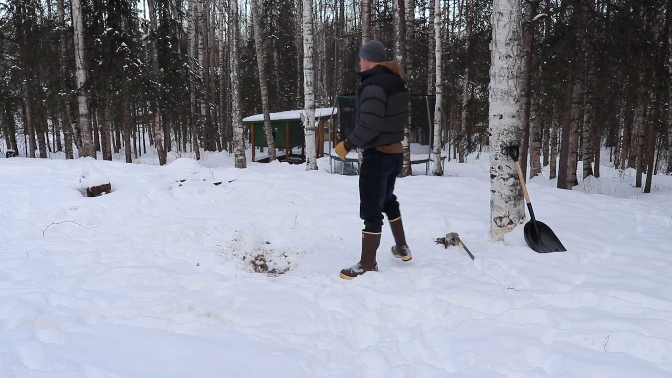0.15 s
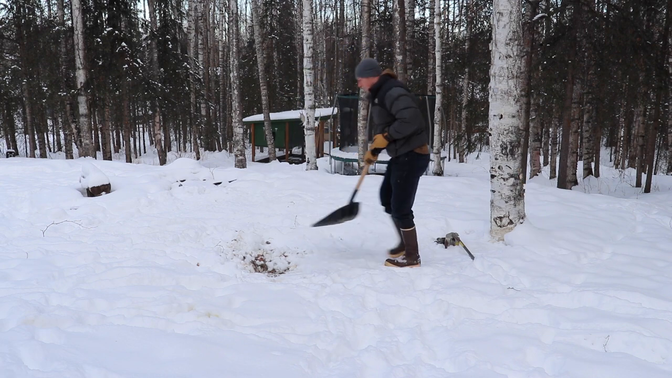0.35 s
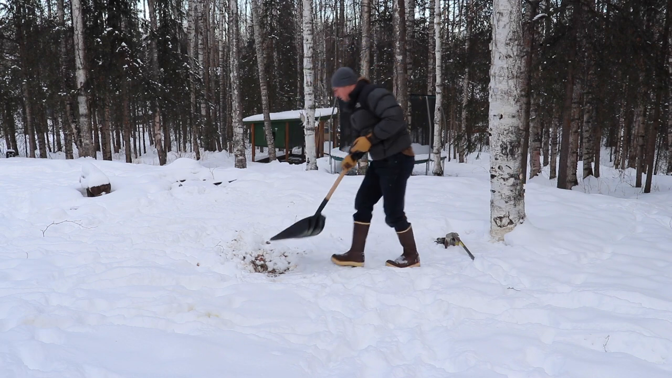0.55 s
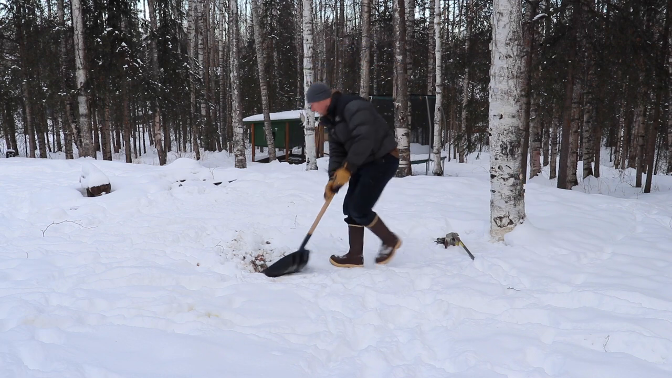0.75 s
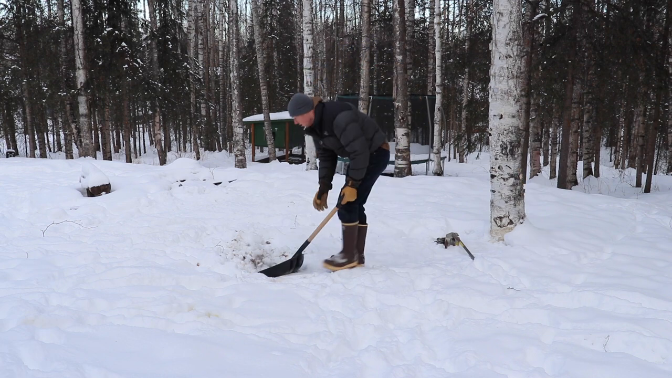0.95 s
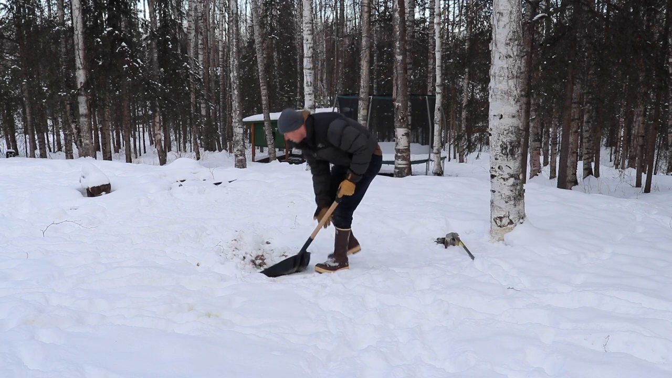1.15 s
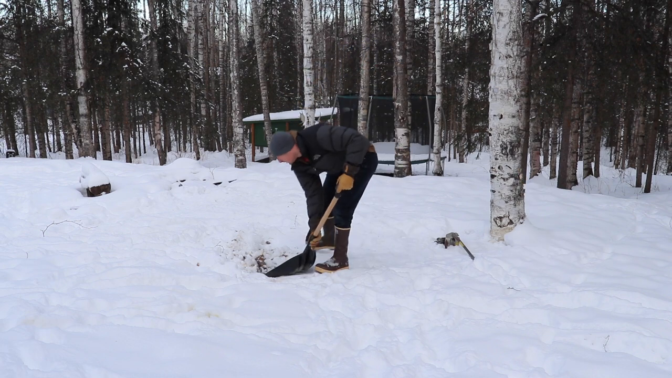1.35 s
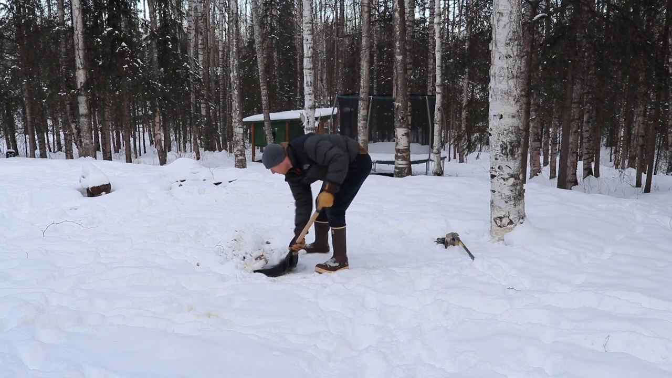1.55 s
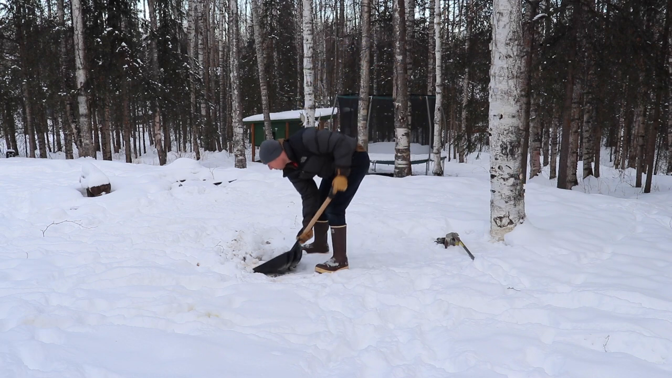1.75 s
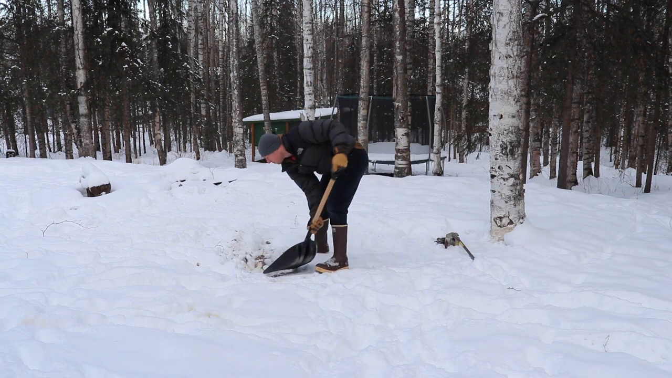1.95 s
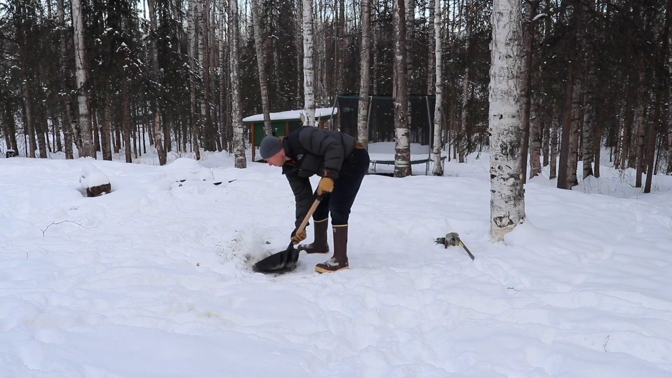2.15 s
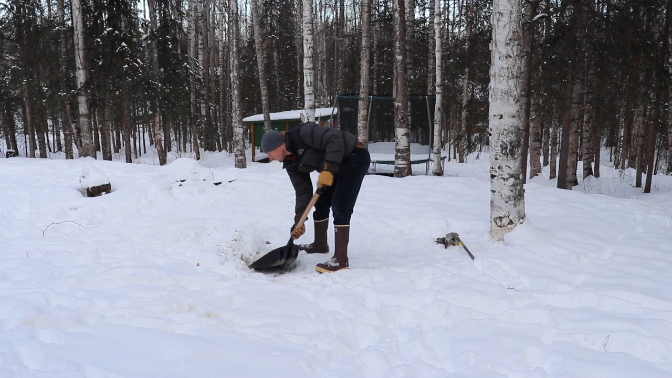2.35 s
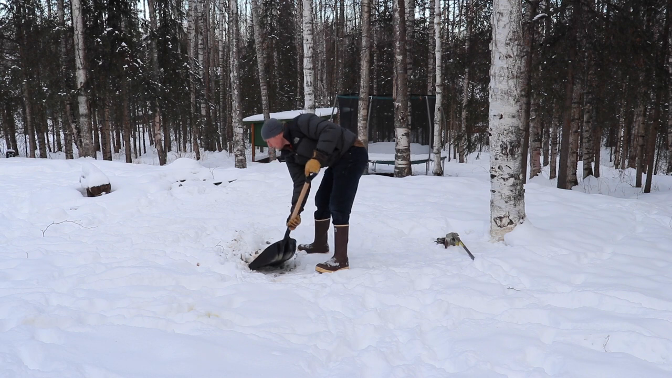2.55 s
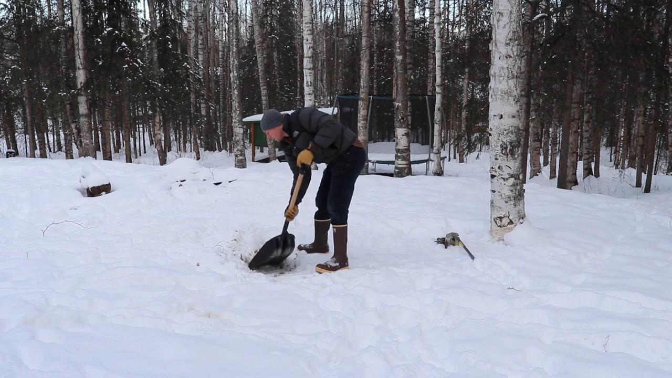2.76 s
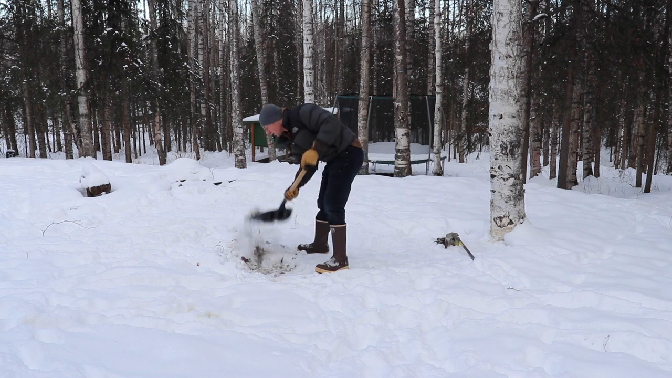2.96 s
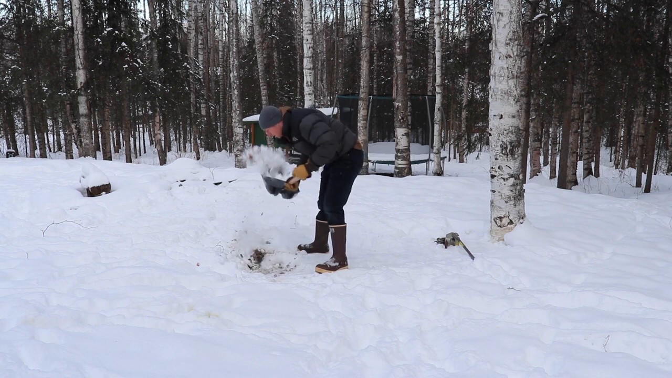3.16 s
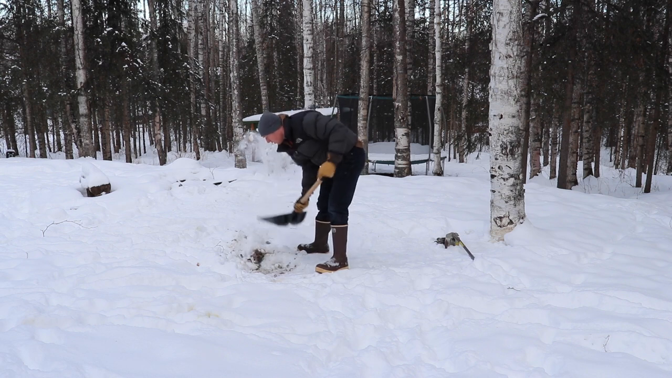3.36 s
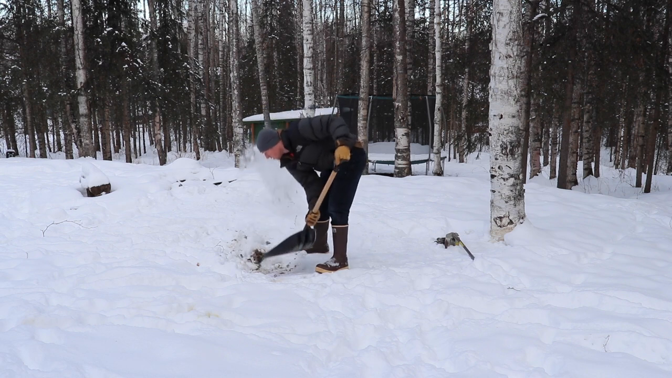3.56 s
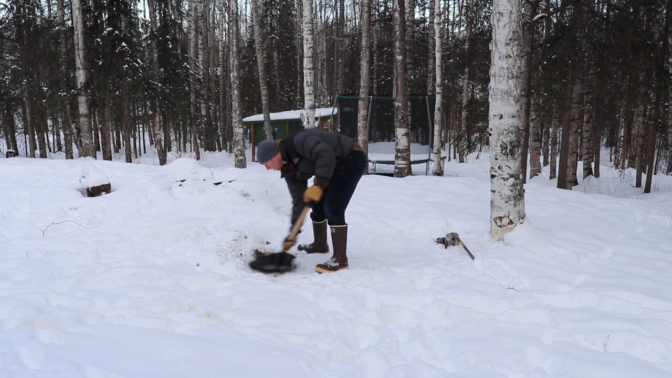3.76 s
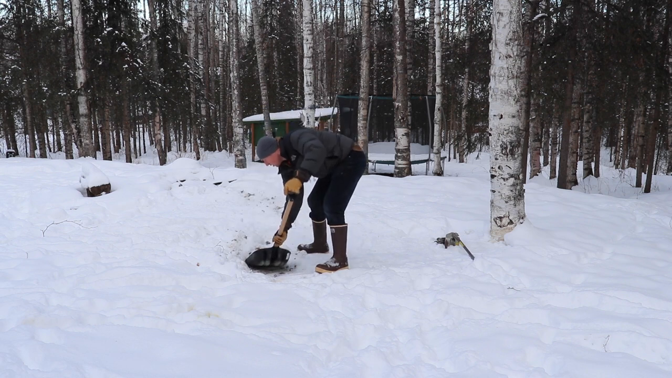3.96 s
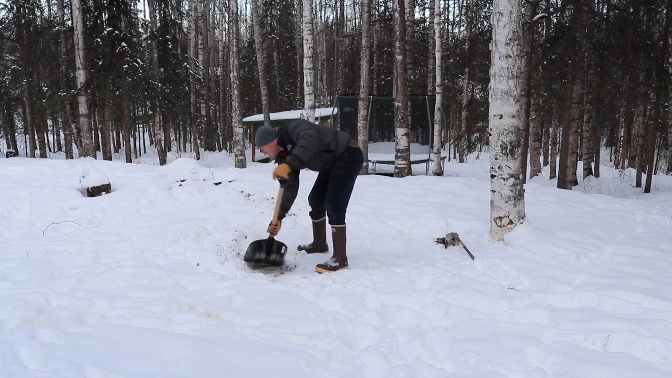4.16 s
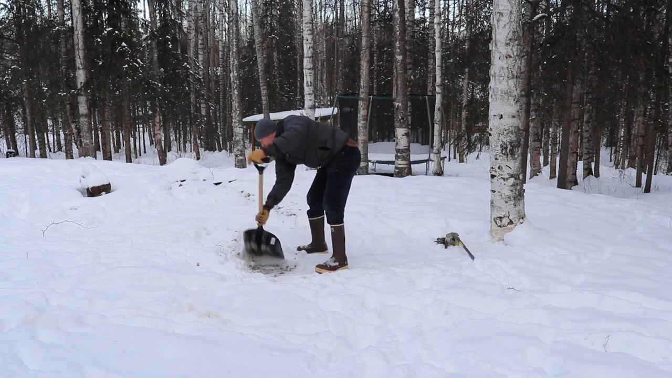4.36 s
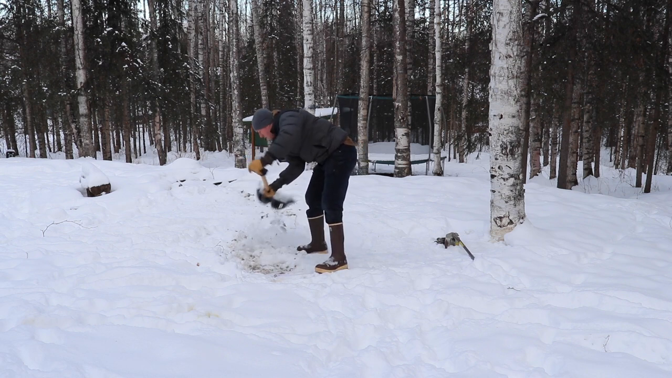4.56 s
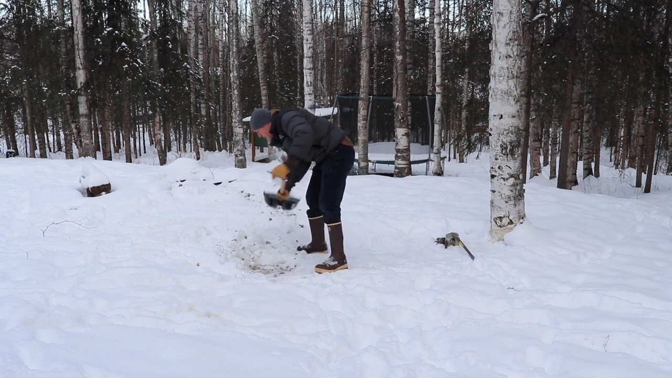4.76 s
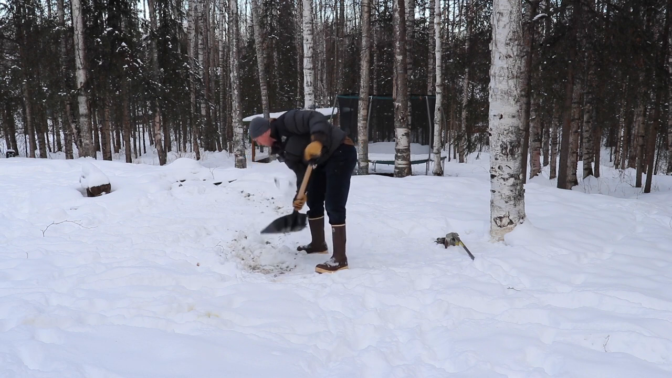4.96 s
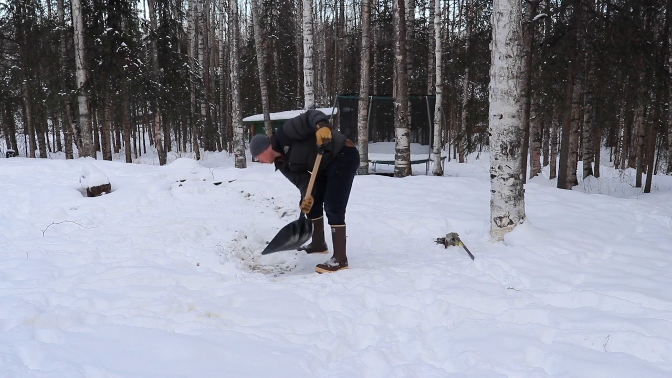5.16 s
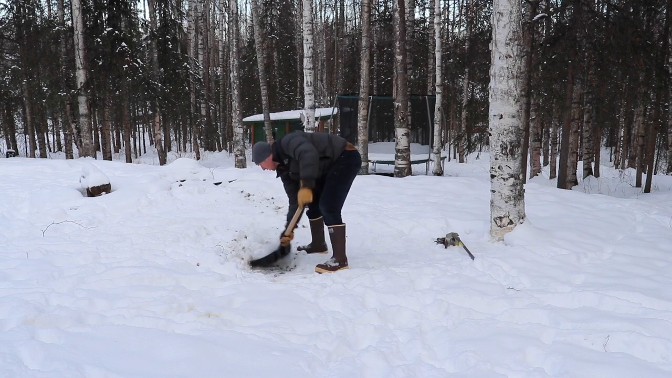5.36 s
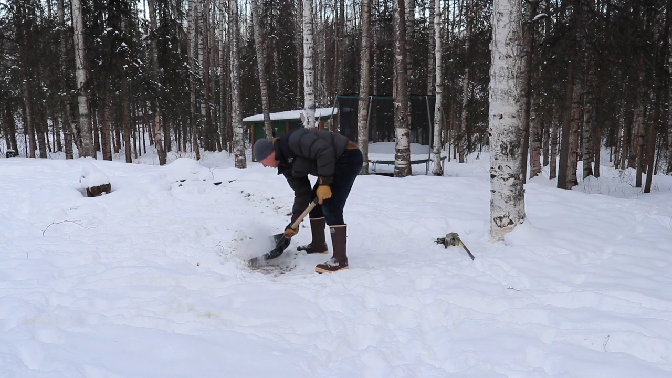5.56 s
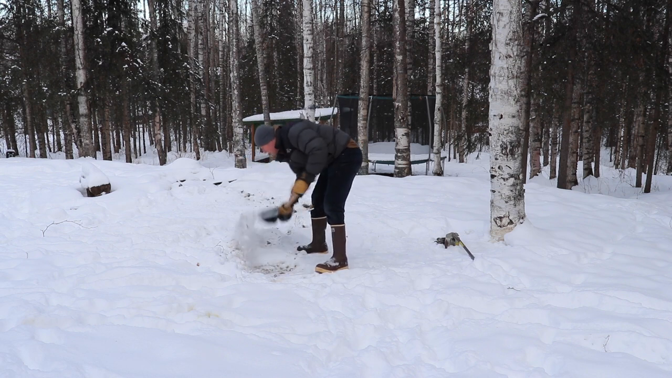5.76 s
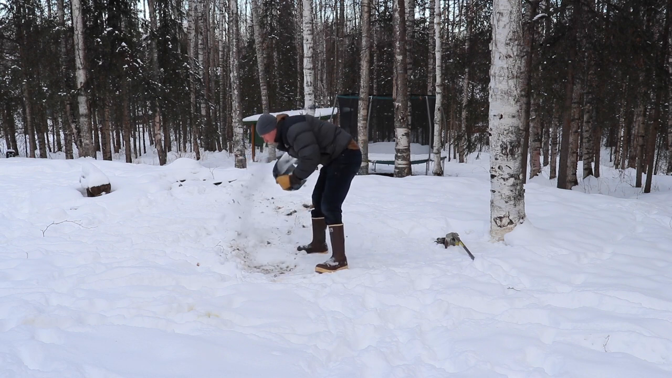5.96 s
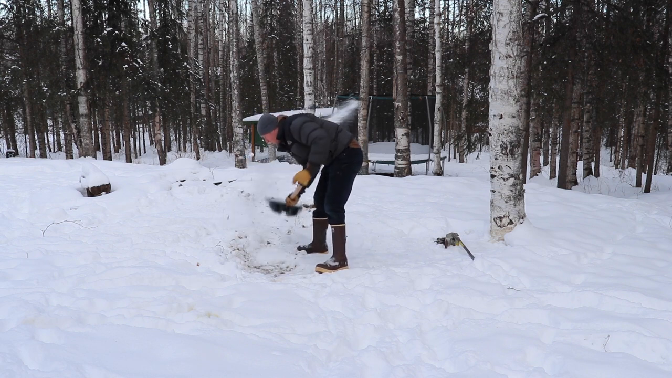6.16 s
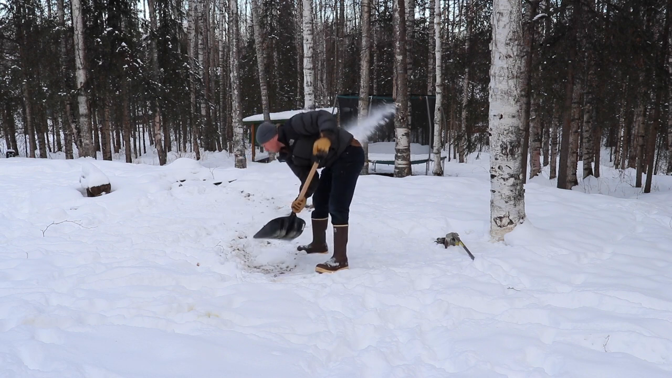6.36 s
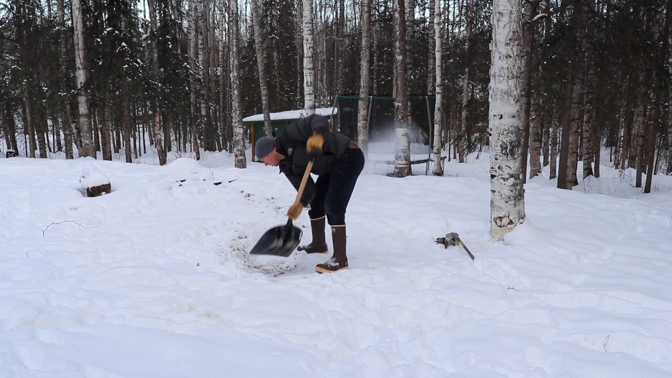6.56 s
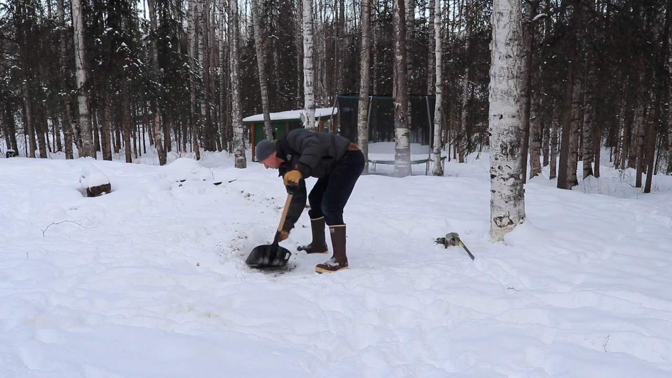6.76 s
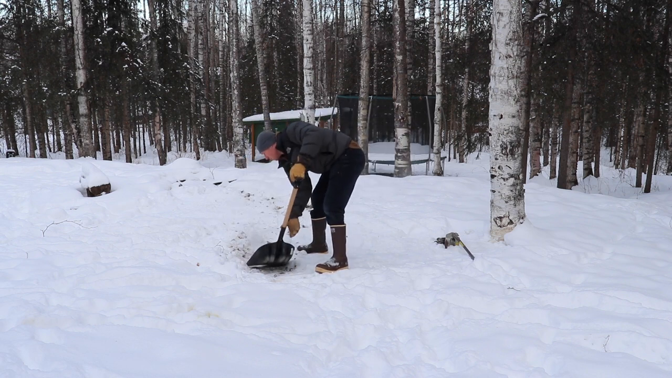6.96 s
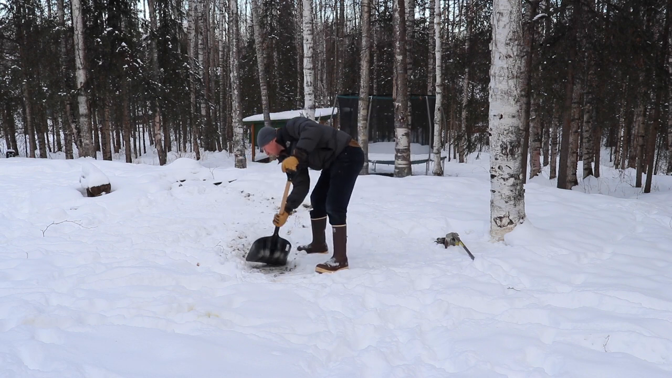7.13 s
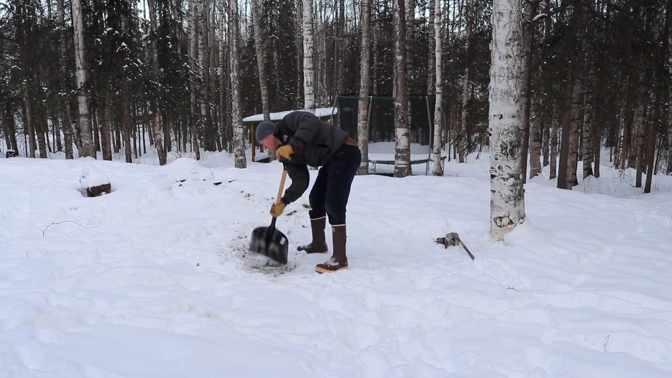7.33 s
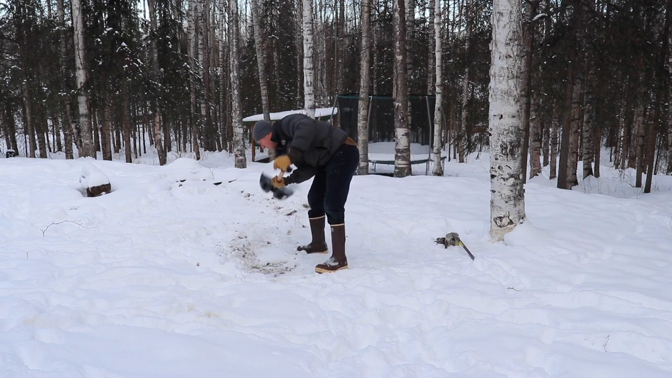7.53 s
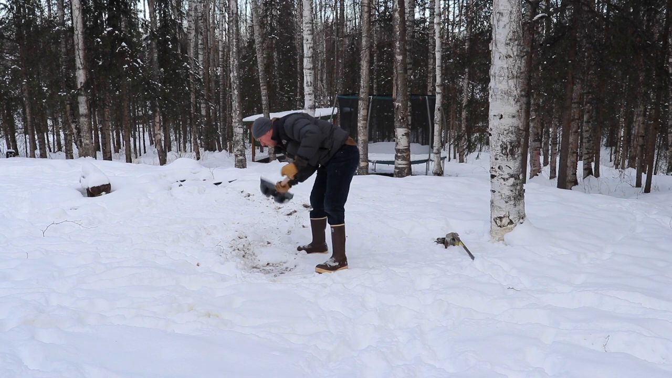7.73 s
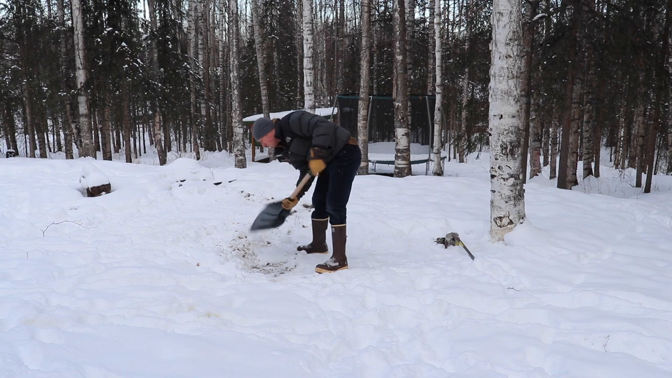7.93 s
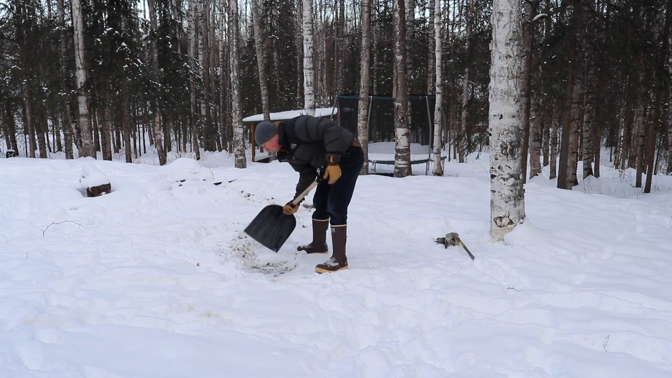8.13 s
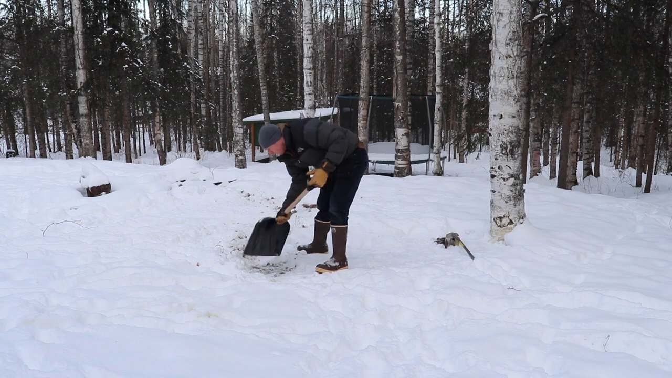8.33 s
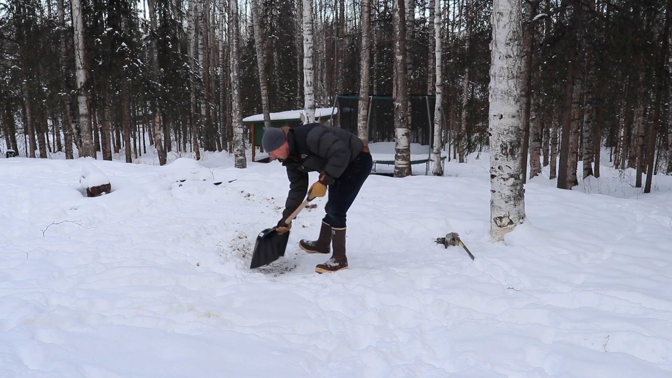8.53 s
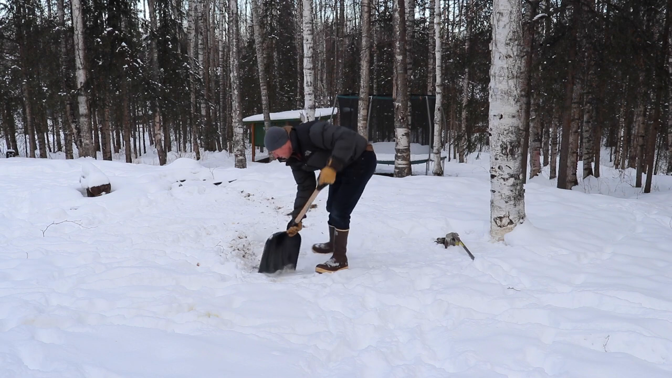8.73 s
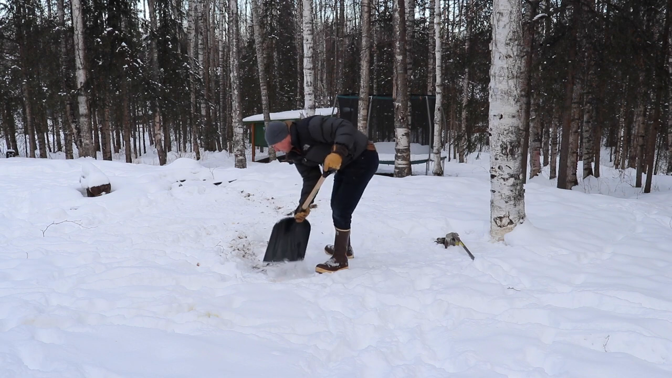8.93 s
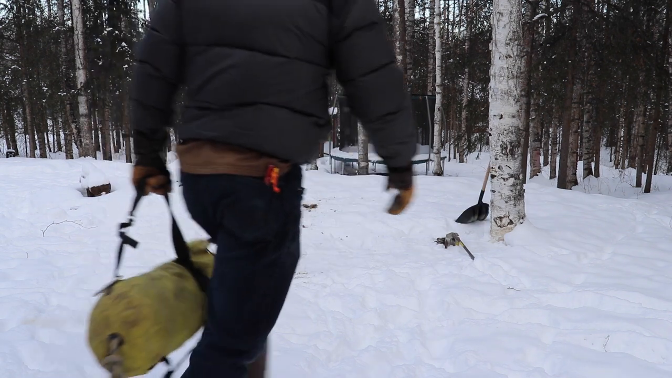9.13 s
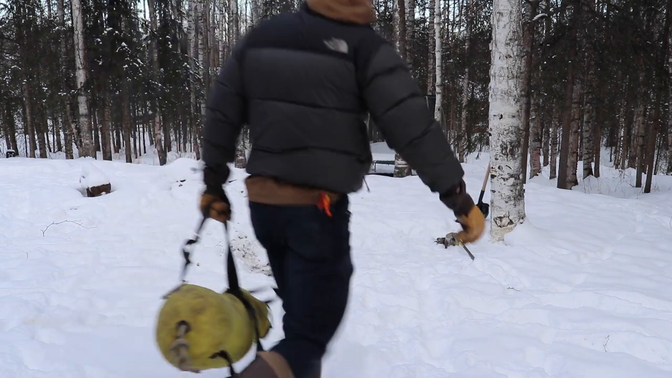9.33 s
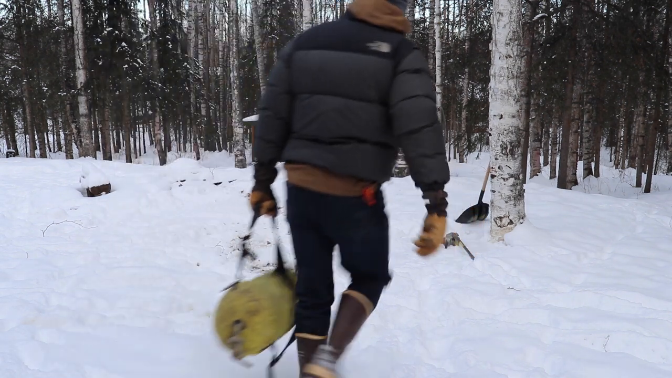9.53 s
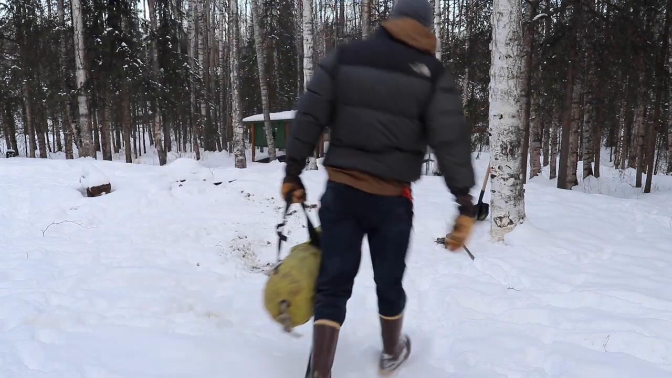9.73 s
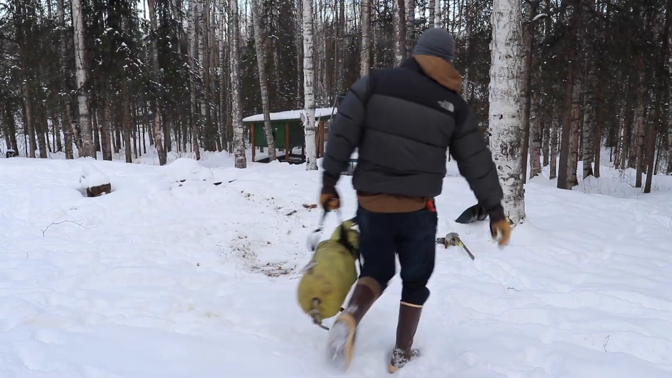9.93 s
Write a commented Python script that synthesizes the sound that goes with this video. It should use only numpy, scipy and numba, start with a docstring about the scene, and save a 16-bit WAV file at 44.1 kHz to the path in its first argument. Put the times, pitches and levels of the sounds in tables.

```python
"""In a still forest, a plastic shovel chops and scrapes packed snow some metres from a small microphone.
Snow crystals break in dense grains and shake the blade; loose snow pours off after each toss.
Boots crunch before the digging and close by afterwards. Tree trunks send back a short echo,
and a far-off hum and the microphone's hiss stay under it all."""
import sys
import numpy as np
from scipy import signal
from scipy.fft import rfft, irfft
from scipy.io import wavfile
from scipy.ndimage import uniform_filter1d
from numba import njit

SR = 44100
rng = np.random.default_rng(int(sys.argv[2]) if len(sys.argv) > 2 else 0)


def log_audio(samples):
    """Write samples as a 16-bit WAV file to the path given in sys.argv[1]."""
    # one column per channel
    frames = np.atleast_2d(samples).T
    # limit to full scale, then quantise
    limited = np.clip(frames, -1, 1)
    pcm = np.round(limited * 32767).astype(np.int16)
    wavfile.write(sys.argv[1], SR, pcm)


N = 440559
TIME = np.arange(N) / SR

# Shoves of the blade into the snow. Ring and ice are added to the level; a mode is a note of the blade.
# start_s, swell_s, hold_s, level_db, fade_db_per_s, ring_db, ice_db,
# lowest_mode_db, edge_modes_db, freest_edge_hz, ground_thump_db
SHOVES = [(0.854, 0.0017, 0.091, -19.5, 192, -8, -2.5, 0.5, -4, 1360, 0.5),
          (1.041, 0.004, 0.012, -22.5, 419, -9, 0, -8, -55, 1310, 2),
          (1.105, 0.19, .09, -27, 210, -7, -7, -17, 11, 1410, 2),
          (1.407, 0.025, 0.015, -22.5, 98, -7, -3.5, -27, 10, 1310, 0),
          (1.549, 0.067, 0.066, -15, 166, -7.5, -5, -3, 4.5, 1770, 4),
          (1.774, 0.0023, 0.03, -21, 348, -9, -9, -2, 0, 1930, -6),
          (1.824, 0.052, 0.045, -20, 150, -12, -6, -14, -5, 1880, -4),
          (2.047, 0.11, 0.065, -17.5, 307.5, -7.5, -5.5, 1.5, 9, 1300, 0.5),
          (2.262, 0.067, 0.2, -32, 67, -5.5, -2.5, -1, 3.5, 1423, -1),
          (2.66, 0.0024, 0.036, -34, 402, -5.5, -24, 4.5, 11, 1387, 6),
          (2.808, 0.1, 0.046, -20.5, 900, -9, -6, 7.5, 13.5, 1210, 4),
          (3.845, 0.0029, 0.01, -13, 300, -7.5, -5, -6, 10.5, 1640, 3),
          (3.884, 0.024, 0.22, -30.5, 202, -10.5, -1.5, 7, -12, 1680, 6.5),
          (4.093, 0.088, 0.055, -22.5, 108, -15.5, -3, 8, 7, 1780, 5),
          (4.333, 0.062, 0.11, -19, 1000, -15, 1, 8, 13, 1760, 5.5),
          (5.434, 0.00068, 0.0048, -12.5, 174, -12, 0, -3, 8.5, 2120, 6),
          (5.58, .003, 0.026, -24.5, 166, -9.5, -6, 5, -1, 1500, -4),
          (5.627, .12, 0.1, -16, 602, -13, -5.5, -2, -1, 1520, -3),
          (6.76, .004, 0.014, -13.5, 701, -8.5, -4.5, 18, 11, 1890, 8),
          (6.804, 0.005, 0.014, -36, 450, 2.5, -8, 6, -10, 1900, -5),
          (6.909, 0.039, 0.0095, -22, 116, -3, 2, 5, 12.5, 2050, -5),
          (7.134, 0.0027, 0.014, -27.5, 300, 3, 0, 3, 18, 1790, -7),
          (7.186, 0.006, 0.09, -24, 294, -5.5, -0.5, 4, 9, 1740, 0),
          (7.326, 0.1, 0.058, -16, 593, -11.5, -4, 5, 5, 1620, -7),
          (8.311, 0.0031, 0.022, -20.5, 286, -2.5, -4.5, -9, 6, 1530, 3),
          (8.394, 0.08, 0.11, -27, 196, -6.5, -5.5, -15, 6, 1500, 5),
          (8.53, 0.0037, 0.16, -19.5, 600, -11, -0.5, -36, 6, 1450, 7),
          (8.703, 0.022, 0.24, -23, 500, -3, -1, -3, 17, 1410, 6),
          (8.978, 0.0094, 0.014, -29, 151, 2, -7.5, 8, 13.5, 1370, -14)]
# Powder sliding off after a toss: start_s, swell_s, hold_s, level_db, fade_db_per_s, ring_db, ice_db
POURS = [(3.001, 0.016, 0.062, -28, 101, -9, -5), (4.497, 0.016, .12, -31.5, 84, -10, -5.5),
         (5.827, 0.011, 0.0074, -27.5, 105, -13.5, 0.5), (7.528, 0.11, 0.06, -34.5, 63, -4.5, -11.5)]
# Faint brushing as the blade swings back: same columns as POURS
BRUSHES = [(3.3, 0.023, 0.099, -50.5, 120, -5, 2), (3.78, .005, 0.05, -51, 300, -17, 13),
           (5.12, 0.1, 0.038, -50.5, 200, -19, 5), (6.0, 0.0059, 0.012, -40.5, 150, -5.5, 4.5),
           (6.38, 0.13, 0.02, -61, 90, -6, 6), (7.9, .1, 0.21, -54, 151, 1.5, -4)]
# The blade held in the air: lowest_mode_db, edge_modes_db, freest_edge_hz, ground_thump_db
RAISED_BLADE = (-4, -4.5, 1510, -12)
# Crust breaking under the edge (ring and ice add to the level):
# time_s, level_db, ring_db, ice_db, clack_hz
CRUST_BREAKS = [(0.843, 5.5, -41, -19.5, 2660), (0.862, -1, -16, -11, 1260), (0.8972, 1, -32, -22, 2260),
                (1.0466, -1.5, -11.5, -17.5, 1500), (1.159, -12, -35, -14, 810),
                (1.26, -11, -17, -8.5, 1950), (1.3299, -13, -8, -15, 820), (1.6025, -1, -27, -23.5, 1520),
                (1.6288, -3, -30, -27, 1230), (1.6547, -3.5, -27, -21, 2770),
                (1.7853, -8, -3.5, -20.5, 1200), (1.9677, -6, -30, -21, 1480),
                (2.0512, -10.5, -16, -11, 1700), (2.5868, -14.5, -12, -9, 1750),
                (2.6718, -10.5, -11, -18, 815), (2.695, -7.5, -17, -20, 810),
                (2.727, -12, -12.5, -16.5, 1750), (2.792, -12, -15, -9.5, 2180),
                (2.8438, -6, -12.5, -21, 900), (2.9037, -9, -30, -6, 1270), (2.9166, -2, -39, -12.5, 1330),
                (3.8544, 2.5, -21, -17, 1180), (3.872, -5, -22, -8, 2800), (3.915, -10, -27, -14, 2300),
                (3.952, -10, -26, -9, 2920), (3.998, -0.5, -33.5, -11.5, 2020),
                (4.0387, -11.5, -12, -9, 2150), (4.1482, -4.5, -28, -17, 1680),
                (4.391, -13, -19, -10, 1870), (4.5304, -11, -21, -12, 1480), (5.435, 5.5, -16, 0.5, 1930),
                (5.591, -9, -18.5, -13.5, 1940), (5.687, -14, -7, -14, 1290), (5.7046, -10, -20, -14, 1530),
                (6.766, -1, -25, -3, 2530), (7.143, -12, 0, -18, 814), (7.3245, 3.5, -17, -24, 1290),
                (7.3565, -9, -5, -9, 3330), (7.432, -0.5, -31, -15, 2950), (7.4442, 1.5, -31, -13, 1430),
                (8.314, 0, -22, -11, 3180), (8.459, -10, -18, -8, 3440), (8.537, 2.5, -25, -22, 1030),
                (8.573, 3, -22, -20, 1600), (8.767, -7.5, -17, -2.5, 1450)]
# Crumbs ticking on the raised blade: same columns as CRUST_BREAKS
CRUMB_TICKS = [(4.6369, -10, -16, -15, 2740), (4.8517, -15, -22, -19, 2500), (6.4502, -36, -14, -4, 842),
               (6.4722, -36, -18, -1, 807)]
# Snow crumbling: breaks that build for a few milliseconds before they snap; same columns as CRUST_BREAKS
SOFT_BREAKS = [(1.085, -4.5, -24, -9, 3400), (1.4106, -13, -26, -19, 2610), (2.0757, 0, -20, -13.5, 1740),
               (2.143, 0, -26, -10, 1320), (2.469, -7, -16.5, -14, 1320), (2.8266, -3.5, -19.5, -23, 1710),
               (2.983, -1, -29, -20, 1420), (4.0808, -2.5, -12.5, -13, 2450),
               (4.1911, -4.5, -39, -13, 1740), (5.822, -6, -13, -16, 1460), (6.958, -5, -30, -9, 2470),
               (7.2008, -6, -9, -15, 616), (8.684, -6, -18, -8, 1490), (8.736, -4, -10, -8, 1290),
               (8.854, -8, -15, -5, 1500), (8.988, -8, -25, -19, 2930)]
# Single shards snapping off, short and dry: time_s, level_db
SHARD_SNAPS = [(1.037, -11), (2.092, -7), (2.8906, -11), (2.929, 2.5), (2.9671, 0), (3.8464, -3),
               (4.01, -14), (4.1325, -12), (4.1633, -10), (4.2316, -16), (4.2624, -18), (4.4117, -7),
               (6.9818, -5), (7.0393, -9), (7.0604, -15.5), (7.4798, -2), (8.341, -6), (8.607, -10),
               (8.6645, -8), (8.692, -4)]
# Low modes of the blade's bowl: pitch_hz, width_hz, level_db
BOWL_MODES = [(394.8, 37.6, -1), (641, 12, -13), (768, 37, 2.5)]
# Modes of the blade's edge: pitch_hz, width_hz
EDGE_MODES = [(1050, 30), (1275, 54), (1500, 64), (1720, 31), (1950, 59), (2350, 32), (2750, 94)]
# Strength of the top treble in each scoop: start_s, gain_db
SCOOP_TREBLE = [(0, 0.5), (1.4, 0.5), (3.0, 5), (3.95, -3), (5.5, 2), (6.7, -1), (8.3, 0.5)]
# Boots pressing on snow (crunch adds to the level):
# start_s, swell_s, hold_s, level_db, fade_db_per_s, crunch_db
STEPS = [(0.42, 0.21, 0.26, -51, 100, 7), (0.66, 0.065, 0.02, -38, 111, 2.5),
         (1.13, 0.0086, 0.063, -35, 200, -29), (9.07, 0.052, 0.15, -44, 200, 4),
         (9.34, 0.067, 0.074, -28.5, 341, -0.5), (9.56, 0.065, 0.16, -41.5, 300, 1),
         (9.8, 0.12, .1, -34.5, 50, -0.5)]
# Snow giving way under a sole: time_s, level_db, crunch_db, pop_hz
SOLE_GIVES = [(0.455, -25, 4, 283), (0.525, -28.5, 8.5, 692), (0.588, -25.5, 6, 676),
              (9.115, -12.5, -4, 714), (9.269, -12, -22, 604), (9.306, -14, -4, 141),
              (9.344, -12.5, -1.5, 231), (9.408, -7, -17, 573), (9.427, -3, -8, 373), (9.47, -13, -22, 517),
              (9.565, -18, -1, 111), (9.63, -12, -10, 627), (9.676, -11, -15, 633), (9.856, -12.5, 5, 416),
              (9.874, -15.5, 9.5, 420), (9.916, -6.5, -6, 511)]
# Tone curves of crushed snow, fine ice, boot thud, boot crunch and the background: pitch_hz, level_db
CRUSH_TONE = [(300, -23), (700, -8.5), (1400, 2), (2800, 1.5), (4300, -4), (6500, -5), (12000, -18)]
ICE_TONE = [(2500, -27.5), (4500, 2), (6500, 1.5), (9000, 2), (13000, -1), (16000, -15)]
THUD_TONE = [(30, -31), (60, -8), (120, 10), (250, 7), (550, 11), (1000, -4), (2500, -35)]
CRUNCH_TONE = [(400, 4.5), (900, 8.5), (2000, 1.5), (5000, -6.5), (10000, -8.5), (16000, -11)]
FOREST_TONE = [(15, -35), (25, -15), (160, -8.5), (282, -1.5), (305, -5.5), (469, -4.5), (1530, -17),
               (3930, -26.5), (6740, -26.5), (8350, -26.5), (10600, -28.5), (15500, -28)]
# Resonances of the microphone's housing: pitch_hz, width_hz, gain_db
MIC_HOUSING = [(6710, 770, -4), (8200, 1230, 7), (10560, 4370, -10.5), (11870, 15200, -2)]

SHOVEL_SOUND_ENDS_S = 9.068
BREAK_T60_S, GIVE_T60_S, SNAP_T60_S = 0.072, 0.051, 0.015  # T60: the time to fade by 60 dB
SOFT_RISE_S, CLACK_FADE_S = 0.0051, 0.0035
SETTLE_DB, SETTLE_DB_PER_S = -17.5, 56  # crumbs settle after each move, quieter than the move itself


def shovel():
    """One jerky force crushes snow, grinds fine ice, rings the blade and thumps the ground."""
    raised, *seating = blade_seating()
    moves, cracks = SHOVES + POURS + BRUSHES, CRUST_BREAKS + CRUMB_TICKS + SOFT_BREAKS
    crack_s, crack_db, ring_db, ice_db, clack_hz = np.transpose(cracks)
    lead_s = SOFT_RISE_S * np.isin(crack_s, np.transpose(SOFT_BREAKS)[0])
    snap_s, snap_db = np.transpose(SHARD_SNAPS)
    snaps = loudness([], 1, SHARD_SNAPS, snap_db, SNAP_T60_S)

    force = np.minimum(stick_slip(100, sag_s=0.0084, steady=1), 1.7)
    force = force ** (1 - 1.4 * raised)  # loose powder hardly sticks
    force = force * edge_stalls(depth=0.27, lead_s=0.032) * (TIME < SHOVEL_SOUND_ENDS_S)
    # Coarse lumps and fine ice also give way in their own time.
    brisk = stick_slip(70, sag_s=0.0013, steady=0.3)
    lump_force = force * stick_slip(66, sag_s=0.041, steady=5.2) * brisk ** 0.37
    crush_gain = loudness(moves, lump_force, cracks, crack_db - 16, BREAK_T60_S, lead_s)
    ice_gain = loudness(moves, force * brisk, cracks, crack_db + ice_db - 5, BREAK_T60_S, lead_s,
                        extra_db_column=6)
    shake_gain = loudness(moves, force, cracks, crack_db + ring_db - 8, BREAK_T60_S, lead_s,
                          extra_db_column=5)

    clumps = undb(-7) * grains(150, 1000, 4500, cycles=14, spread_db=3, smooth=0)
    crush = grains(4000, 482, 7030, cycles=7.7, spread_db=2.7, smooth=0.81) + clumps
    crush *= np.hypot(undb(-12.5) * snaps, crush_gain)
    shards = undb(-11) * grains(160, 3500, 14300, cycles=10, spread_db=4.2, smooth=0)
    ice = grains(1600, 2920, 18500, cycles=3.6, spread_db=4.7, smooth=0.87) + shards
    ice *= np.hypot(undb(-15.5) * snaps, ice_gain)
    shake = grains(900, 89, 2310, cycles=1.5, spread_db=1.7, smooth=0.91) * shake_gain

    # Each crack and snap also gives one sharp knock.
    crack_at = (crack_s * SR).astype(int)
    shake[crack_at] += undb(crack_db + ring_db + 15)
    crush[crack_at] += undb(crack_db - 3)
    crush[(snap_s * SR).astype(int)] += undb(snap_db + 2)
    snow = undb(-4.5) * colour(crush, CRUSH_TONE) + colour(ice, ICE_TONE)
    return snow + blade_and_ground(shake, crush, *seating) + clacks(crack_at, clack_hz, crack_db - 13.5)


def blade_and_ground(shake, crush, lowest_db, edge_db, freest_hz, ground_db):
    """Shaking rings the plastic bowl and thumps the ground; crushed snow rings the edge."""
    shares = (1, 0, -0.31)  # the top bowl mode weakens as the lowest grows
    bowl = sum(blade_mode(shake * undb(db + share * lowest_db), hz, width)
               for (hz, width, db), share in zip(BOWL_MODES, shares))
    # The snow muffles an edge mode more the further it lies from the freest one.
    edge = sum(blade_mode(crush * undb(edge_db - 33 * np.abs(np.log2(hz / freest_hz))), hz, width)
               for hz, width in EDGE_MODES)
    body = colour(shake, [(120, -40), (300, -4.5), (700, 6.5), (1200, -10.5), (3000, -34.5)])
    ground_tone = [(30, -35.5), (65, 3.5), (125, 7), (250, 16), (800, -32)]
    thump = colour(shake * undb(ground_db), ground_tone, size=8192)
    return undb(11.5) * bowl + undb(1.5) * edge + undb(-5.5) * body + undb(-19.5) * thump


def blade_mode(x, hz, width_hz):
    """One note of the blade, wandering in pitch as the plastic flexes."""
    bend = 0.027 * np.interp(TIME, np.arange(160) / 15, rng.standard_normal(160))
    turn = np.exp(2j * np.pi * hz * (1 + bend) / SR)
    return ring(x, turn, np.exp(-np.pi * width_hz / SR))


def blade_seating():
    """Whether the blade is raised at each moment, then the four values for how it sits in the snow."""
    in_snow = [(row[0], 0, *row[7:]) for row in SHOVES]
    in_air = [(row[0], 1, *RAISED_BLADE) for row in POURS]
    start_s, *columns = np.transpose(sorted(in_snow + in_air))
    current = np.maximum(np.searchsorted(start_s, TIME, side="right") - 1, 0)
    return [column[current] for column in columns]


def clacks(starts, hz, db):
    """Each crack makes one short, pitched clack."""
    poles = np.exp((2j * np.pi * hz - 1 / CLACK_FADE_S) / SR)
    return cut(pings(starts, poles, undb(db), np.full(len(starts), SR // 40)), "highpass", 350)


def edge_stalls(depth, lead_s):
    """The edge sticks and the grinding dips just before the crust breaks."""
    break_s = np.transpose(CRUST_BREAKS)[0]
    wait_s = np.append(break_s, np.inf)[np.searchsorted(break_s, TIME)] - TIME
    return 1 - depth * np.exp(-wait_s / lead_s)


def scoop_treble(x):
    """The top treble is stronger in some scoops than in others."""
    start_s, db = np.transpose(SCOOP_TREBLE)
    gain = undb(db)[np.searchsorted(start_s, TIME, side="right") - 1]
    top = signal.sosfiltfilt(signal.butter(2, 10500, "high", fs=SR, output="sos"), x)
    return x + (gain - 1) * top


def boots():
    """Snow packs down in lumps: pops, and dull thuds with a crunch on top from one creaking load."""
    give_s, db, crunch_db, pop_hz = np.transpose(SOLE_GIVES)
    load = stick_slip(75, sag_s=0.0037, steady=0.51)
    thud = grains(500, 51, 1140, cycles=3.6, spread_db=7.7, smooth=1)
    thud *= loudness(STEPS, load, SOLE_GIVES, db - 16.5, GIVE_T60_S)
    crunch = grains(1200, 440, 11000, cycles=1.4, spread_db=5.2, smooth=0.96)
    crunch *= loudness(STEPS, load, SOLE_GIVES, db + crunch_db - 20, GIVE_T60_S, extra_db_column=5)
    poles = np.exp((2j * np.pi - 1.6) * pop_hz / SR)
    pops = pings((give_s * SR).astype(int), poles, undb(db - 10.5), (6 * SR / pop_hz).astype(int))
    return colour(thud, THUD_TONE) + colour(crunch, CRUNCH_TONE) + cut(pops, "highpass", 90)


def grains(per_s, low_hz, high_hz, cycles, spread_db, smooth):
    """Crystals snap at random, some louder than most; smooth is the share of sliding-powder hiss."""
    when, pitch, chance = rng.random((N // 4, 3))[:int(per_s * N / SR)].T
    hz = low_hz * (high_hz / low_hz) ** pitch
    poles = np.exp((2j * np.pi - 2 / cycles) * hz / SR)
    sizes = hz * undb(-spread_db * np.log(np.maximum(chance, .02)))  # bigger when high, for an even tone
    snaps = pings((when * N).astype(int), poles, sizes, (3 * cycles * SR / hz).astype(int))
    return np.sqrt(1 - smooth) * unit(snaps) + np.sqrt(smooth) * rng.standard_normal(N)


def stick_slip(per_s, sag_s, steady):
    """Snow sticks and slips: the force jumps within 2 ms at random, then sags to a steady part."""
    catches = (rng.random(N) < per_s / SR) * rng.random(N)
    jumps = uniform_filter1d(catches, size=SR // 500)
    return unit(steady + signal.lfilter([1], [1, -np.exp(-1 / (sag_s * SR))], jumps))


def loudness(moves, force, cracks, crack_db, t60_s, lead_s=0., extra_db_column=None):
    """One layer's gain over time: jerky moves swell, hold and fade; cracks add dying bursts."""
    power = np.zeros(N)
    for move in moves:
        start_s, swell_s, hold_s, db, fade_db_per_s = move[:5]
        if extra_db_column:
            db += move[extra_db_column]
        start = int(start_s * SR)
        age = TIME[:min(int((swell_s + hold_s + .6) * SR), N - start)]
        fading_s = np.maximum(age - swell_s - hold_s, 0)
        fade_db = np.maximum(-fade_db_per_s * fading_s, SETTLE_DB - SETTLE_DB_PER_S * fading_s)
        swell = np.minimum(age / swell_s, 1) ** 1.19
        power[start:start + len(age)] += (undb(db + fade_db) * swell) ** 2
    power *= force ** 2
    age = TIME[:SR // 8]
    sharp = (undb(-60 * age / t60_s) + np.exp(-age / 0.0018)) * np.minimum(age / 0.00074, 1)
    soft = 1.2 * undb(-60 * np.maximum(age - SOFT_RISE_S, 0) / t60_s) * np.minimum(age / SOFT_RISE_S, 1)
    for crack, db, lead in zip(cracks, crack_db, np.broadcast_to(lead_s, len(cracks))):
        part = power[int((crack[0] - lead) * SR):][:len(age)]
        burst = soft if lead else sharp
        part += (undb(db) * burst[:len(part)]) ** 2
    return np.sqrt(power)


def trunk_echo(x, t60_s, db):
    """Tree trunks scatter a short, dull tail back."""
    age = TIME[:SR // 2]
    tail = rng.standard_normal(len(age)) * undb(-60 * age / t60_s) * (age > .008)
    echo = signal.oaconvolve(x, tail / np.linalg.norm(tail))[:N]
    return undb(db) * cut(echo, "lowpass", 4000, order=1)


def mic_housing(x):
    """The microphone's housing lifts one treble band and dulls others."""
    for hz, width_hz, db in MIC_HOUSING:
        band = signal.lfilter(*signal.iirpeak(hz, hz / width_hz, SR), x)
        x = x + (undb(db) - 1) * band
    return x


def hum_and_hiss():
    """Far-off hum and microphone hiss; the bass wavers a little."""
    calm = colour(rng.standard_normal(N), FOREST_TONE, size=8192)
    waver_db = 2 * unit(uniform_filter1d(uniform_filter1d(rng.standard_normal(N), 1500), 1500))
    bass = cut(calm, "lowpass", 900)
    return undb(-48.5) * (calm + (undb(waver_db) - 1) * bass)


@njit
def pings(starts, poles, sizes, lengths):
    """Add up brief, dying swings; each pole sets one swing's pitch and fade."""
    y = np.zeros(N)
    for k in range(len(starts)):
        z = sizes[k] + 0j
        for i in range(starts[k], min(starts[k] + lengths[k], N)):
            y[i] += z.imag
            z *= poles[k]
    return y


@njit
def ring(x, turn, fade):
    """A resonance whose pitch may move from sample to sample; gain near 1 at the centre."""
    y, z = np.empty(len(x)), 0j
    for i in range(len(x)):
        z = z * turn[i] * fade + x[i]
        y[i] = 2 * (1 - fade) * z.real
    return y


def colour(x, points, size=2048):
    """Shape the tone along (pitch_hz, level_db) points; white noise keeps its level."""
    hz, db = np.transpose(points)
    grid_hz = np.maximum(np.arange(size // 2 + 1) * SR / size, 1)
    curve_db = np.interp(np.log(grid_hz), np.log(hz), db)
    cepstrum = irfft(np.log(undb(curve_db)), size)
    # Fold it so that the filter never rings ahead of a sound.
    cepstrum[1:size // 2] *= 2
    cepstrum[size // 2 + 1:] = 0
    response = irfft(np.exp(rfft(cepstrum)), size)
    return signal.oaconvolve(x, response / np.linalg.norm(response))[:N]


def cut(x, kind, hz, order=2):
    """A gentle filter: lowpass keeps what is below hz, highpass what is above."""
    return signal.sosfilt(signal.butter(order, hz, kind, fs=SR, output="sos"), x)


def undb(db):
    """Turn decibels into a gain."""
    return 10 ** (np.asarray(db) / 20)


def unit(x):
    """Scale to an average power of 1."""
    return x / np.sqrt(np.mean(x ** 2))


def scene():
    """Shovel and boots with their echo, over the background, in one channel."""
    near = scoop_treble(shovel()) + boots()
    near = near + trunk_echo(near, t60_s=.25, db=-16)
    return (mic_housing(near) + hum_and_hiss())[None]


def record(dry):
    """The recorder drops the deep bass, clips anything past full scale and cuts off the top."""
    clipped = np.clip(cut(dry, "highpass", 45, order=1), -1, 1)
    return signal.sosfilt(signal.ellip(10, .2, 60, 15660, fs=SR, output="sos"), clipped)


dry = scene()
out = record(dry)
log_audio(out)
```